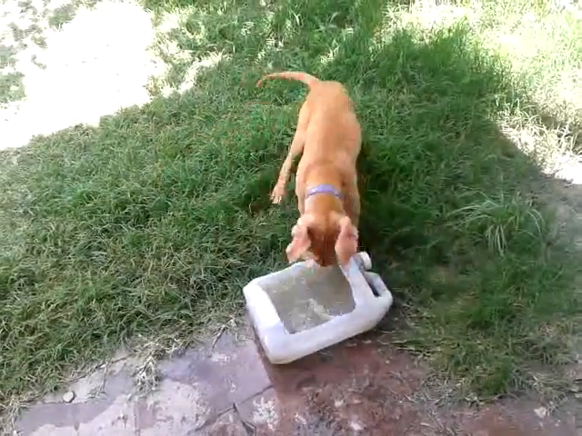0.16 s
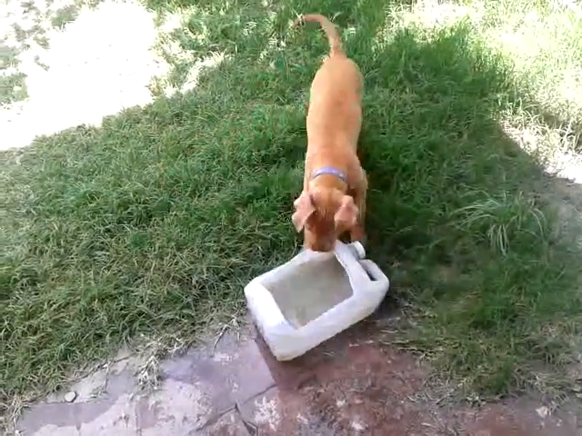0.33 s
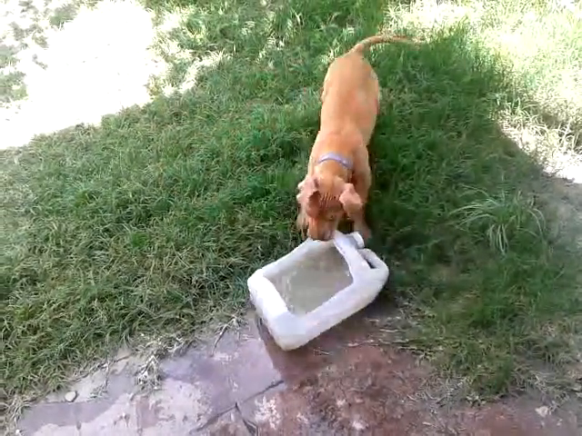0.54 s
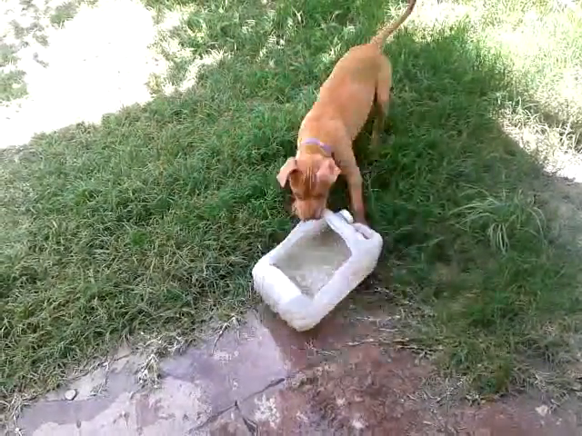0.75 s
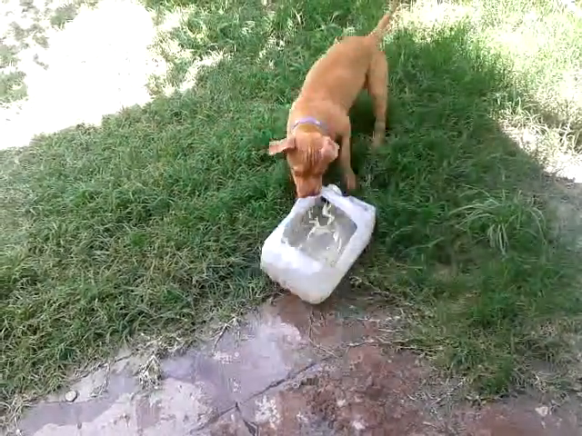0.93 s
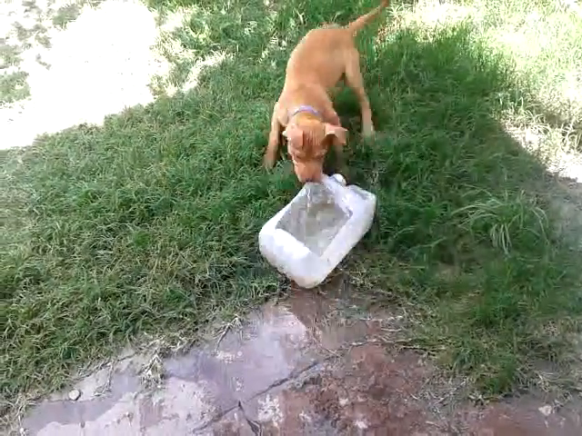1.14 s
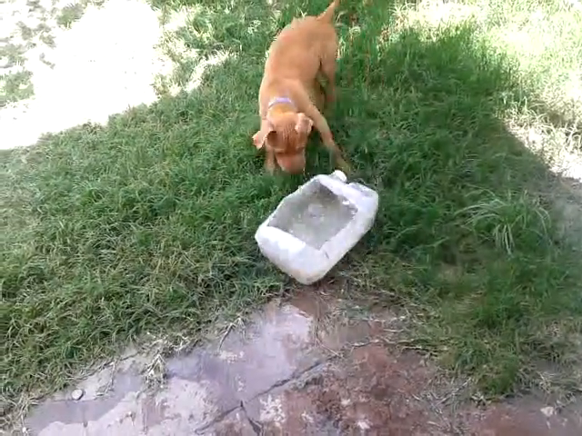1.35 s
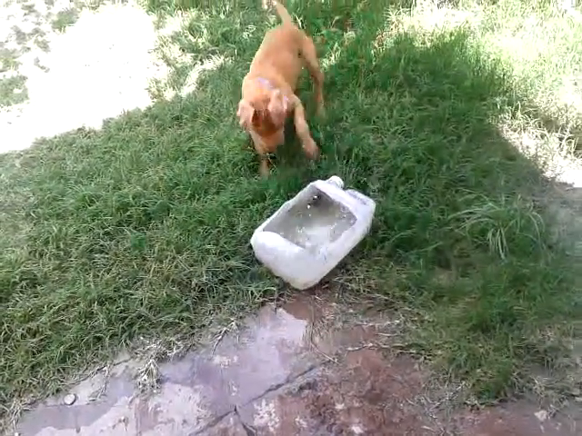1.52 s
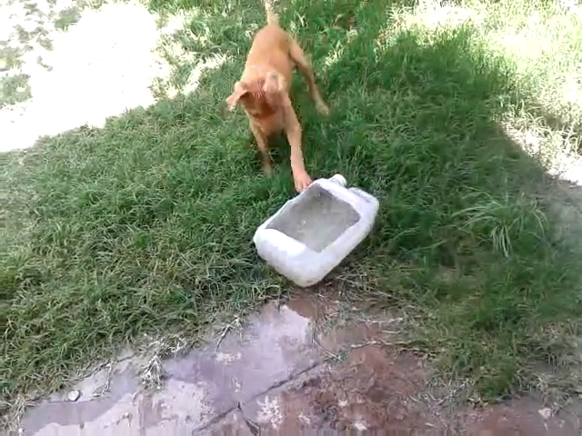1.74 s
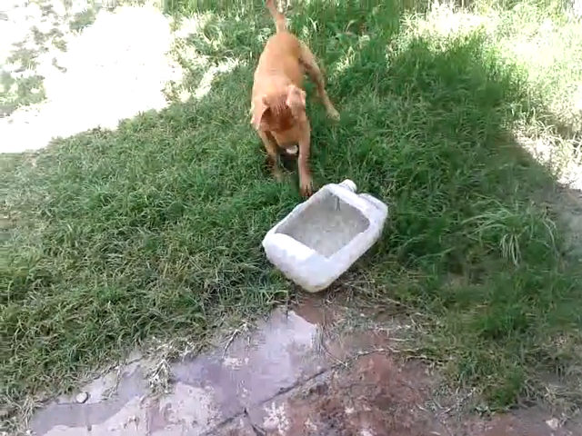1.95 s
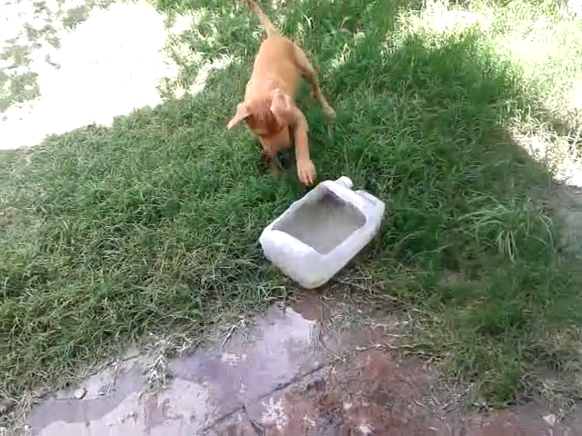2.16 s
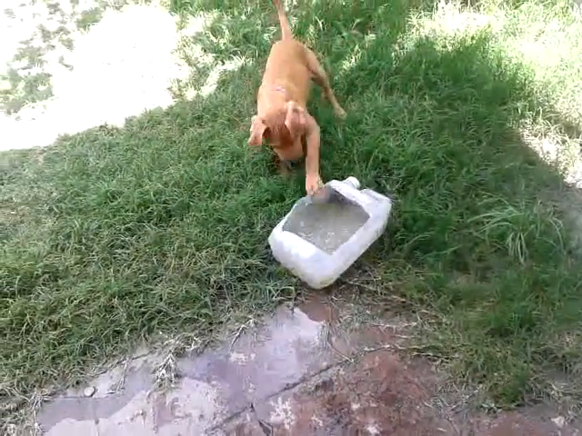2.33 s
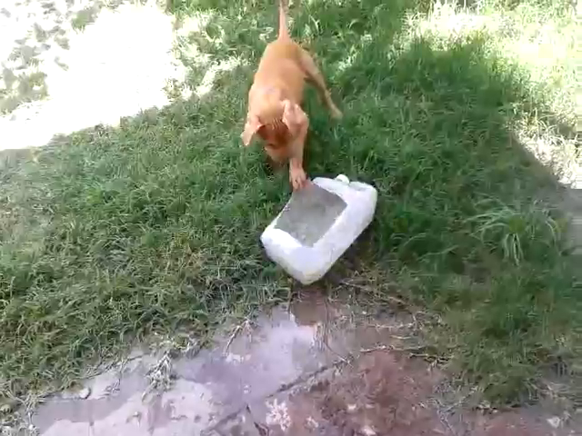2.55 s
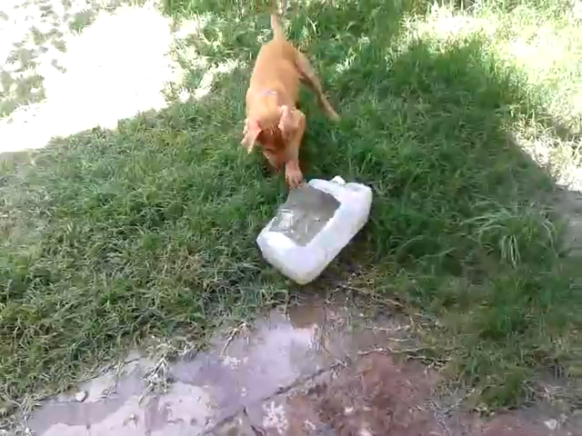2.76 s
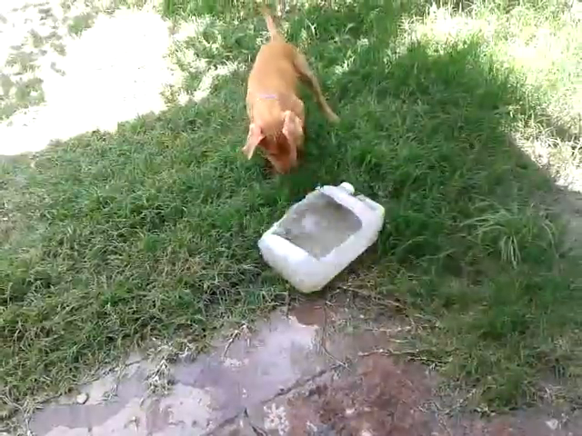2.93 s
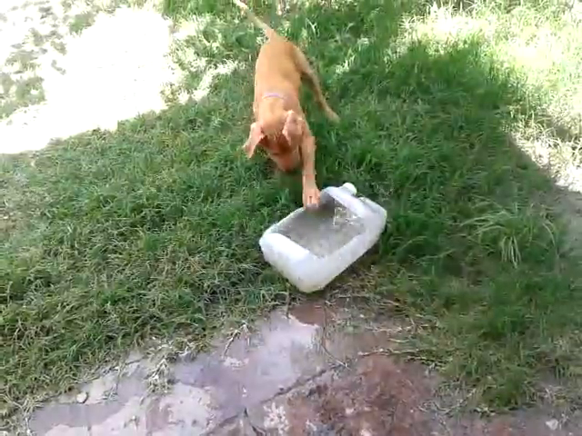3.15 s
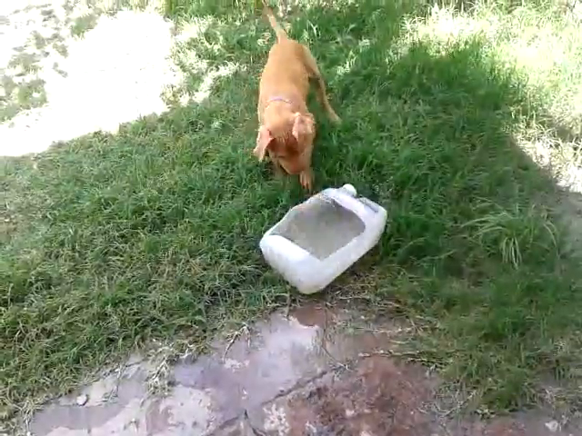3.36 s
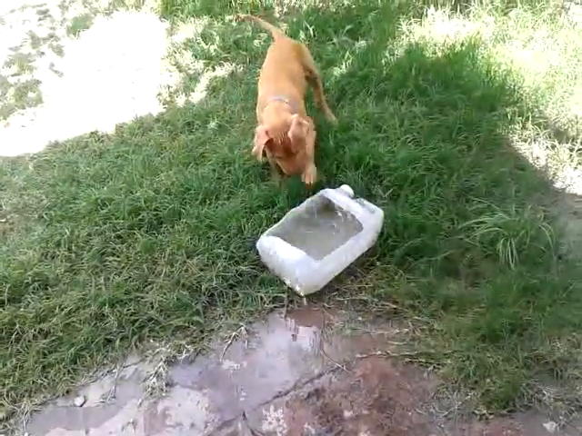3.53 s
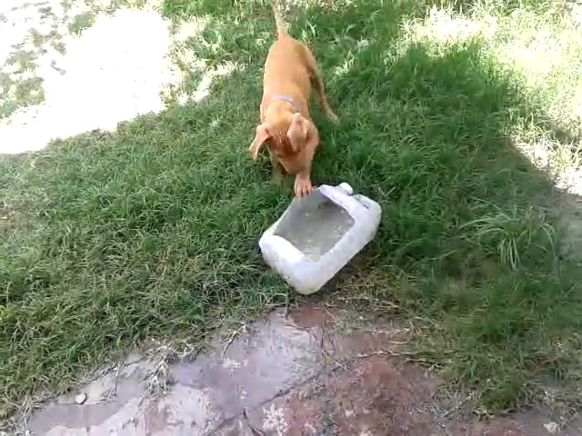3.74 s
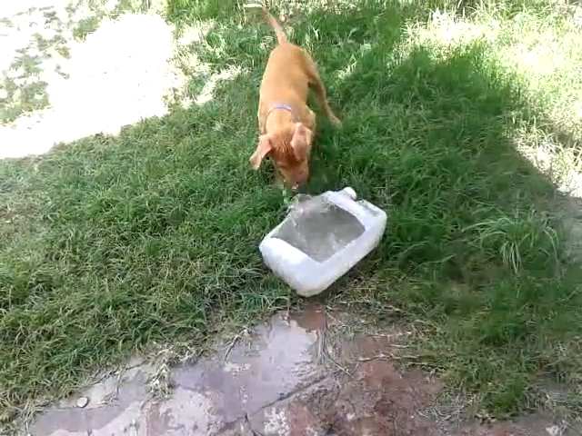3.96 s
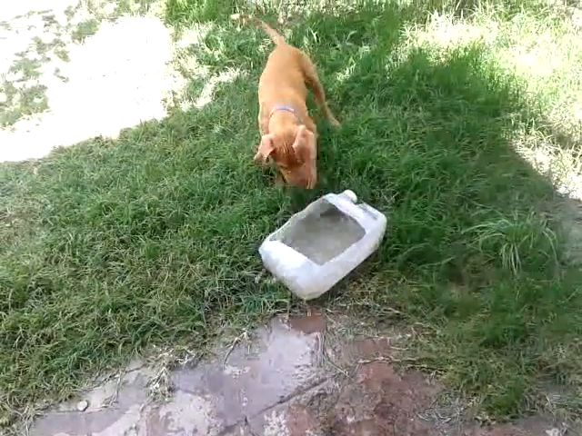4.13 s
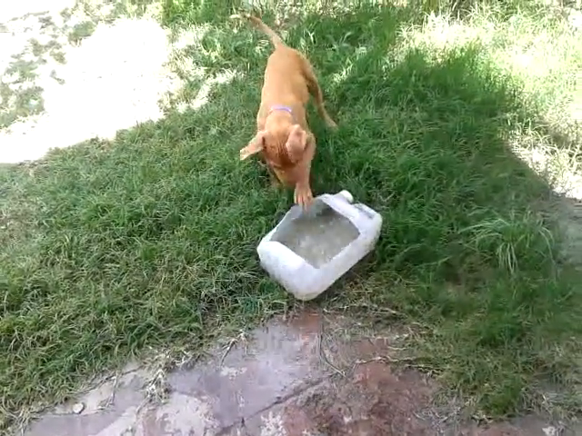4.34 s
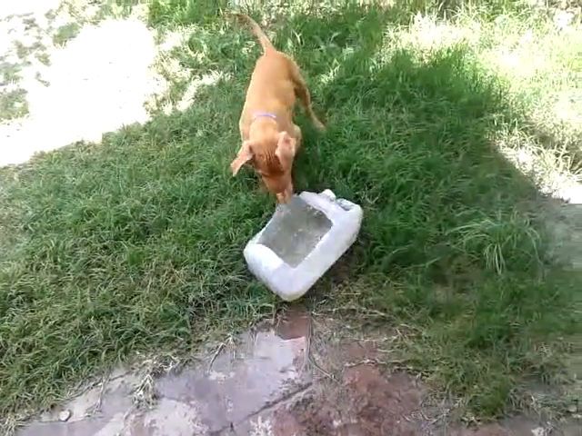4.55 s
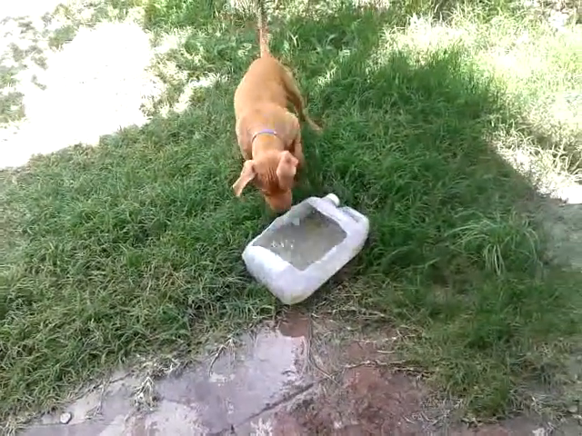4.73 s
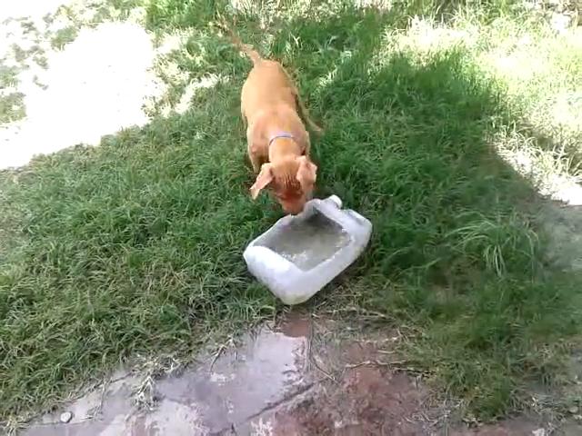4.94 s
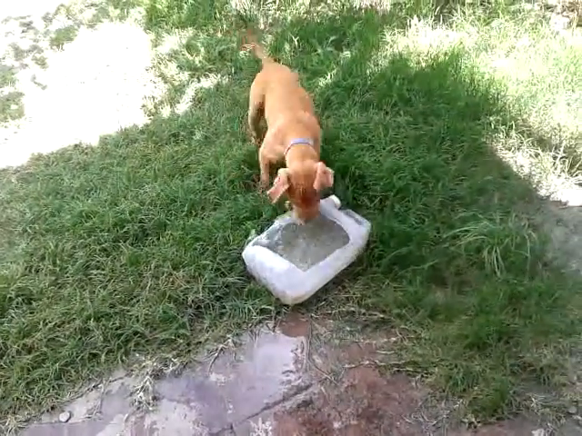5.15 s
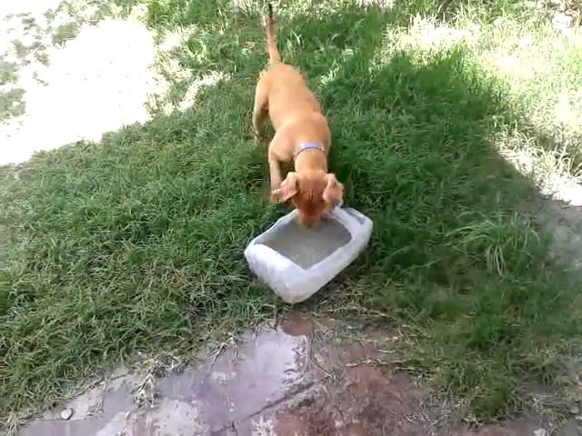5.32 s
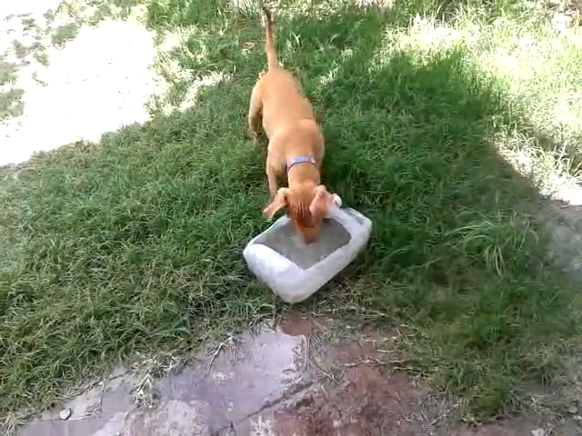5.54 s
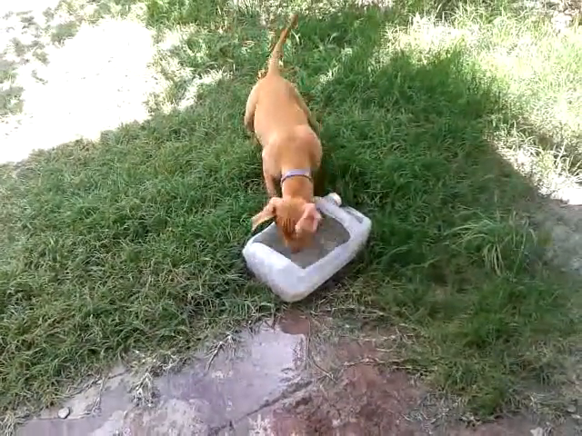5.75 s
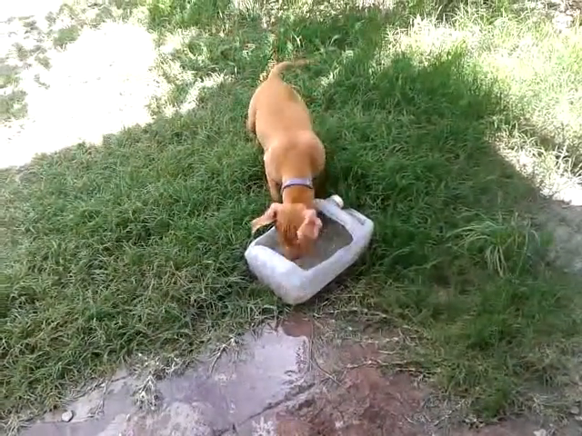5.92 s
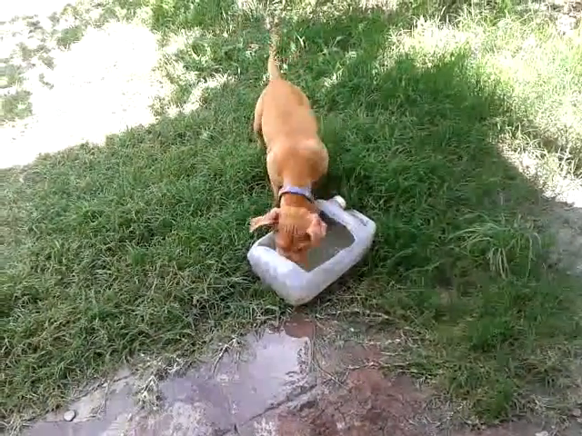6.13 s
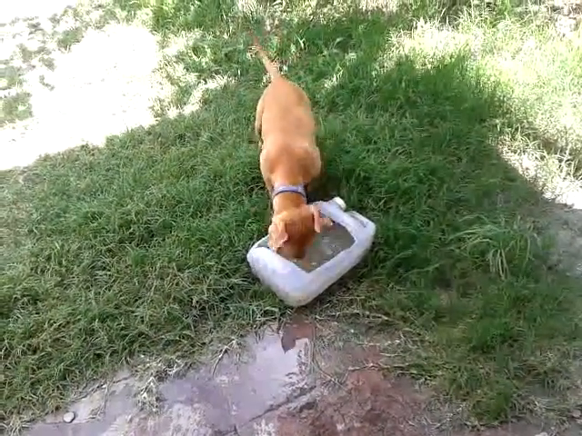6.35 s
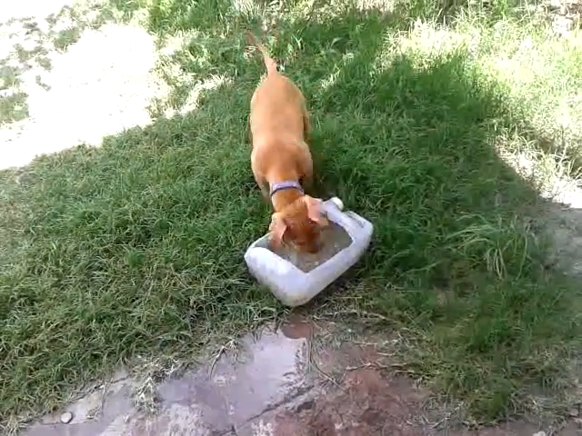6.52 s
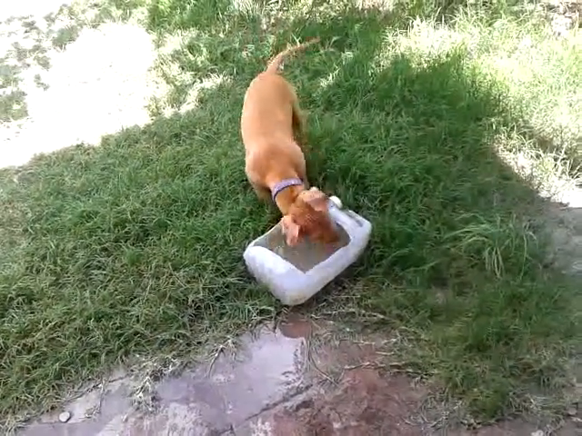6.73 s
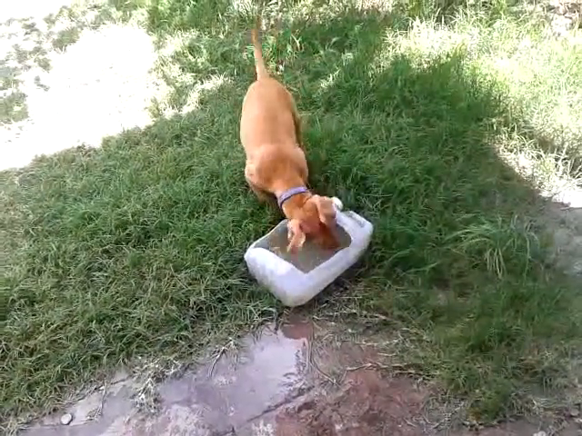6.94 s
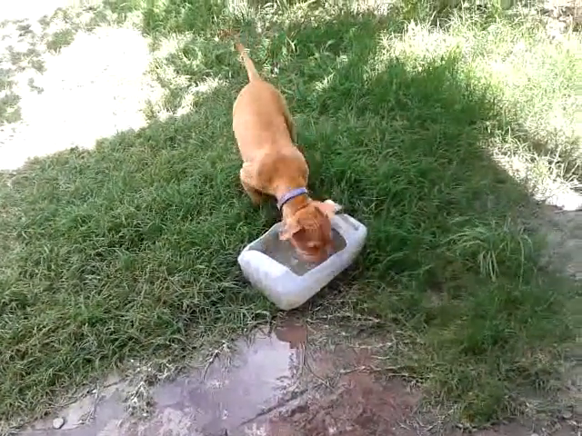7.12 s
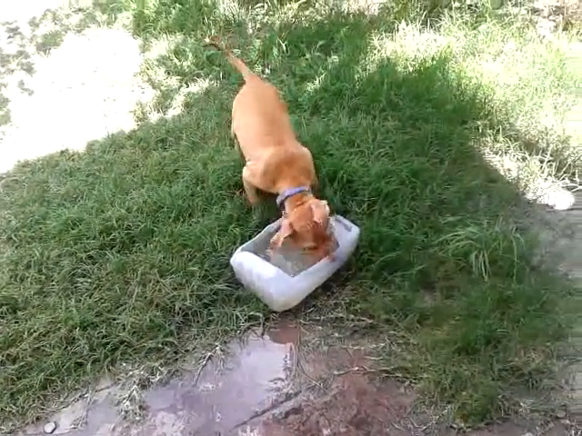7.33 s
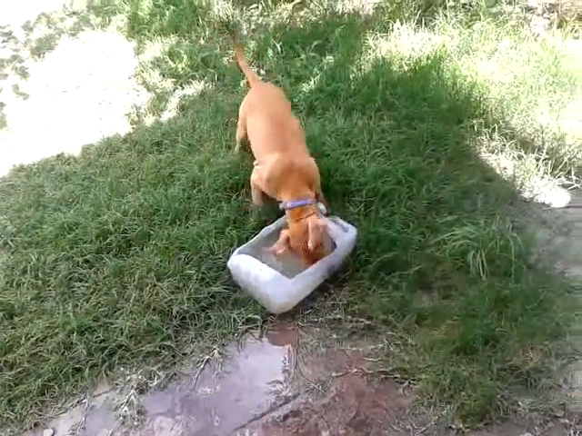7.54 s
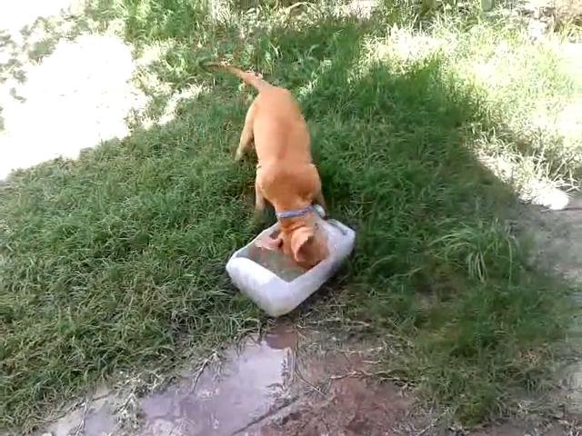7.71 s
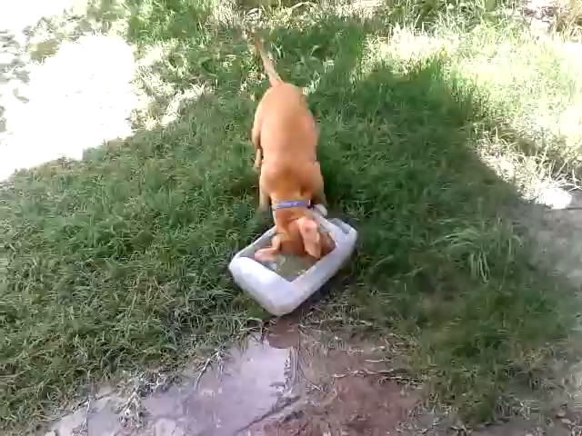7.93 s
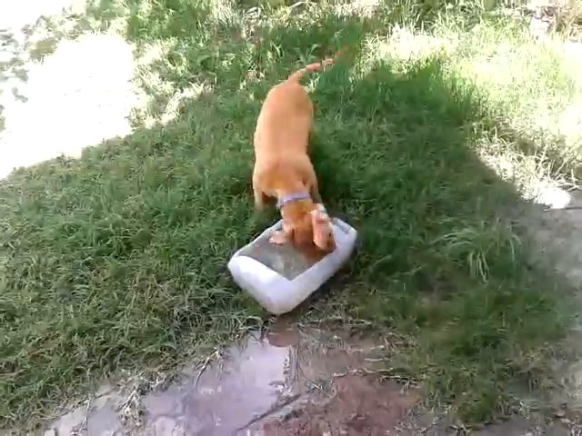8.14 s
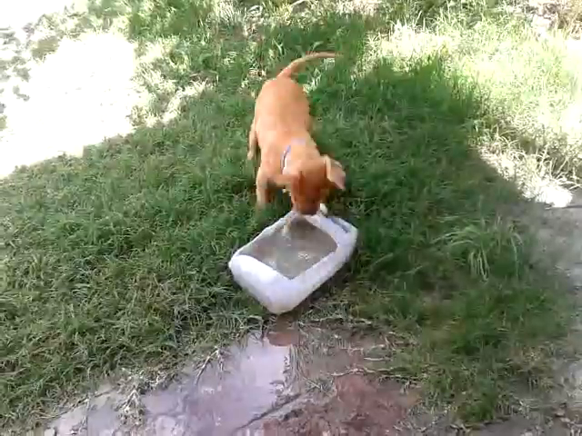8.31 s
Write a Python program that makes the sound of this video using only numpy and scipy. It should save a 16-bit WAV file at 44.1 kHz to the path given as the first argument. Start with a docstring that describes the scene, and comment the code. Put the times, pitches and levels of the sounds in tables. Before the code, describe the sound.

Outdoors, irregular hollow plastic knocks, grassy scraping and watery plops give way to gentle rhythmic dog lapping, with faint distant motor buzz and hiss.

```python
"""On a lawn in a yard, a puppy paws and noses a cut-open plastic jug holding a little water, then laps from it.
Claws ring the jug's damped modes with ticks and rasp, and the sliding base rustles as dense random grains.
Water is single bubble tones with gliding pitch, plus swells of bubble froth, low slosh and spray.
Nearby walls return a short wash; a distant motor of smeared pulses buzzes over filtered-noise rumble and hiss."""
import sys
import numpy as np
from scipy import signal
from scipy.fft import rfft, irfft
from scipy.io import wavfile
from scipy.ndimage import uniform_filter1d

SR = 44100
rng = np.random.default_rng(int(sys.argv[2]) if len(sys.argv) > 2 else 0)


def wav_record(signal):
    """Record a signal, one row per channel, as 16-bit PCM in the file named by sys.argv[1]."""
    frames = np.transpose(np.atleast_2d(signal))
    bounded = np.clip(frames, -1, 1)
    # unit amplitude maps onto the largest positive 16-bit level
    quanta = np.round(bounded * 32767).astype(np.int16)
    wavfile.write(sys.argv[1], SR, quanta)


N = 373527
TIME = np.arange(N) / SR


def undb(db):
    """Decibels to gain."""
    return 10 ** (np.asarray(db) / 20)


def unit(x):
    """Scale to rms 1."""
    return x / np.sqrt(np.mean(x ** 2) + 1e-20)


def attack_unit(x):
    """Scale to rms 1 over the first 9 ms."""
    return x / np.sqrt(np.mean(x[:int(.009 * SR)] ** 2))


def curve(table, axis=1):
    """One column of a table, joined by straight lines in time."""
    rows = np.array(table)
    return np.interp(TIME, rows[:, 0], rows[:, axis])


def colour(x, points):
    """Filter by a (Hz, dB) outline that falls away steeply past its ends; rms 1."""
    hz, db = np.transpose(points)
    f = np.maximum(np.fft.rfftfreq(len(x), 1 / SR), 1)
    outline = undb(np.interp(np.log(f), np.log(hz), db))
    low_end = 1 / np.sqrt(1 + (hz[0] / f / np.sqrt(2)) ** 8)
    high_end = 1 / np.sqrt(1 + (f / hz[-1] / np.sqrt(2)) ** 8)
    return unit(irfft(rfft(x) * outline * low_end * high_end, len(x)))


def band(x, lo_hz, hi_hz):
    """Causal band-pass."""
    edges = np.clip([lo_hz, hi_hz], 10, .45 * SR)
    return signal.sosfilt(signal.butter(2, edges, "band", fs=SR, output="sos"), x)


def fade(t, t60):
    """Exponential decay, down 60 dB after t60 seconds."""
    return np.exp(-np.log(1000) * t / max(t60, .001))


def walk(rate):
    """Smooth chance with a spread near 1, drawn anew `rate` times a second."""
    k = int(SR / rate)
    steps = np.repeat(rng.standard_normal(N // k + 1), k)
    return unit(uniform_filter1d(steps, k)[:N])


def add(out, s, sound):
    """Mix a sound in at a time in seconds."""
    i = max(int(s * SR), 0)
    out[i:i + len(sound)] += sound[:max(N - i, 0)]


def grains(rate, spread_db):
    """Dense random ticks of uneven size, about `rate` a second."""
    size_db = spread_db * np.minimum(rng.exponential(size=N), 4)
    return (rng.random(N) < rate / SR) * rng.standard_normal(N) * undb(size_db)


def bubble(hz, t60, rise, onset_s=0.00022):
    """A damped tone gliding by `rise` octaves a second, as an air pocket does on nearing the surface."""
    t = np.arange(int(max(t60, .002) * SR)) / SR
    cycles = np.cumsum(hz * 2 ** (rise * t)) / SR
    return np.sin(2 * np.pi * cycles) * fade(t, t60) * (1 - np.exp(-t / onset_s))


# swell of the low outdoor rumble: start_s, level_db
RUMBLE_SWELL = [(0, -49.5), (1.05, -48), (1.45, -51), (1.62, -59), (2.4, -51), (2.9, -52.5), (3.15, -45.5),
                (4.1, -50), (4.75, -51), (5.55, -50), (5.85, -52.5), (6.2, -49.5), (6.85, -53.5),
                (7.45, -52), (7.95, -51.5), (8.47, -51.5)]
# tone of the rumble: pitch_hz, level_db
RUMBLE_COLOUR = [(18, -3), (28, -4.5), (42, -5), (62, 0), (85, -10.5), (130, -30)]
# tone of the steady air and hiss: pitch_hz, level_db
AIR_COLOUR = [(60, 2.5), (110, 0), (200, -1.5), (300, -2.5), (500, -8), (900, -14.5), (1500, -17),
              (2300, -18.5), (3300, -21), (6000, -24.5), (10000, -26), (15500, -28)]


def outdoors(air_db=-54.0, hum_db=-66.0):
    """A swelling rumble and a faint wavering hum under nearly steady air and hiss, all filtered noise."""
    rumble = colour(rng.standard_normal(N), RUMBLE_COLOUR) * undb(curve(RUMBLE_SWELL))
    hum = undb(hum_db) * unit(band(rng.standard_normal(N), 202, 246))
    air = colour(rng.standard_normal(N), AIR_COLOUR) * undb(air_db + 0.83 * walk(4.7))
    return rumble + hum + air


# tone of the distant motor's casing: pitch_hz, level_db
MOTOR_COLOUR = [(150, -27.5), (400, -47), (850, 2.5), (1400, -10), (1900, -1), (2100, 5.5), (2350, 2),
                (2700, -5), (3300, -16.5), (5000, -28)]
BUZZ_HZ = 89.9  # mean pulse rate, two pulses to a shaft turn


def motor(buzz_db=-63.0, shaft_db=-61.5):
    """A distant motor hums at its shaft rate and buzzes twice a turn; the path smears each pulse."""
    pulse_count = np.cumsum(BUZZ_HZ * (1 + .001 * walk(3))) / SR
    # flat spectrum with scattered phases: a smeared click
    pulse = np.fft.fftshift(irfft(np.exp(.6j * rng.standard_normal(257))))
    pulses = np.interp(pulse_count % 1, np.linspace(0, 1, len(pulse)), pulse)
    buzz = undb(buzz_db) * colour(pulses, MOTOR_COLOUR)
    hum = undb(shaft_db + 2 * walk(1.67)) * np.sin(np.pi * pulse_count)
    return buzz + hum


# air pockets closing in the water: start_s, level_db (before the gulps' lift), starting pitch_hz, t60_s
BUBBLES = [(0.155, -34, 400, 0.046), (.172, -45, 531, 0.089), (.205, -38.5, 820, 0.041),
           (.828, -42, 710, 0.11), (1.07, -30, 278, 0.041), (1.109, -35.5, 370, .05),
           (1.136, -39, 1660, .037), (1.152, -28, 210, 0.044), (1.511, -39.5, 1740, .044),
           (1.834, -34, 324, .07), (2.030, -49.5, 340, 0.1), (2.485, -37, 390, 0.054),
           (2.940, -28, 489, 0.13), (3.201, -41.5, 1780, .07), (3.260, -40, 715, 0.074),
           (3.285, -41, 3380, .03), (3.422, -26, 368, 0.071), (3.480, -39, 1440, 0.028),
           (3.619, -39, 3080, .016), (3.934, -34, 205, .06), (4.016, -25, 414, 0.051),
           (4.095, -33.5, 312, 0.033), (4.196, -40, 2420, 0.019), (4.704, -25, 314, .049),
           (4.828, -42, 1680, .044), (5.042, -41, 2160, .026), (5.203, -29, 253, 0.023),
           (5.246, -37, 204, 0.071), (5.351, -33, 2300, 0.02), (5.824, -42, 388, 0.088),
           (5.930, -43.5, 784, 0.03), (6.078, -43, 319, 0.15), (6.098, -42, 374, 0.16),
           (6.166, -45, 3320, .016), (6.611, -47, 340, .12), (6.724, -41.5, 405, 0.073),
           (7.099, -47, 1820, 0.04), (7.210, -39, 1290, 0.032), (7.366, -31.5, 1550, 0.026),
           (7.463, -31, 268, 0.039), (7.481, -39.5, 430, 0.08), (7.551, -30, 1760, 0.018),
           (7.770, -36, 388, 0.054), (7.807, -38.5, 1640, 0.029), (7.820, -37.5, 2370, .022),
           (7.861, -39, 1690, 0.026), (7.896, -39.5, 1500, .019), (7.962, -38.5, 903, 0.071)]


def gulps(lift_db=2.5, rise_oct=0.22, glide_scatter=0.65):
    """The larger single bubbles and drips; most climb a little in pitch as they ring."""
    out = np.zeros(N)
    for (s, db, hz, t60), chance in zip(BUBBLES, rng.standard_normal(len(BUBBLES))):
        rise = rise_oct * (1 + glide_scatter * chance) / t60
        add(out, s, undb(db + lift_db) * bubble(hz, t60, rise))
    return out


def yard(x, low_db=-6.5, low_t60=0.24, high_db=-10.5, high_t60=0.097, build_s=0.0051):
    """Nearby walls return a short wash in which the lows last longest."""
    t = np.arange(SR // 2) / SR
    noise = rng.standard_normal((2, len(t))) * (1 - np.exp(-t / build_s))
    low, high = noise[0] * fade(t, low_t60), noise[1] * fade(t, high_t60)
    low_echo = undb(low_db) * band(low / np.linalg.norm(low), 303, 900)
    high_echo = undb(high_db) * band(high / np.linalg.norm(high), 1010, 6900)
    return signal.fftconvolve(x, low_echo + high_echo)[:N]


# the jug sliding over grass: start_s, level_db
SLIDE = [(.27, -65), (.39, -49), (.48, -51), (.57, -56.5), (.68, -54), (.82, -44), (.90, -51),
         (1.13, -47.5), (1.35, -56.5), (1.52, -50), (1.60, -54), (1.79, -55.5), (1.865, -49.5), (1.96, -68)]
# tone of the rustling grass: pitch_hz, level_db
SLIDE_COLOUR = [(130, -4), (380, 5), (560, -3), (730, 2.5), (1150, -7), (1700, 1.5), (2500, -4.5),
                (3200, -9), (4100, -22.5), (7200, -18.5), (9000, -28.5), (14000, -42)]
JOLT_DB, JOLT_T60_S = -9.5, 0.07  # extra scrape when a knock jolts the sliding jug, relative to the knock


def slide(catch_db=-9.0, judder_db=3.0):
    """The base judders over grass, jolted by each knock: a dense rustle, stiffer stalks catching as ticks."""
    moving = (TIME > SLIDE[0][0]) & (TIME < SLIDE[-1][0])
    rustle = unit(grains(7000, spread_db=2.0)) * undb(judder_db * walk(70))
    catches = undb(catch_db) * unit(grains(220, spread_db=1.0))
    drag = undb(curve(SLIDE))
    for s, db, *_ in KNOCKS:
        add(drag, s, undb(db + JOLT_DB) * fade(TIME[:SR // 4], JOLT_T60_S))
    return colour(rustle + catches, SLIDE_COLOUR) * drag * moving


# the jug's modes: pitch_hz, level_db (balance within its mode group), t60_s
JUG_MODES = [(278, -8, 0.033), (370, 5.5, 0.043), (482, -2.5, 0.05), (611.6, -9.5, 0.14), (715, 6.5, 0.031),
             (830, 7, 0.029), (954, -15.5, 0.098), (1170, -25, 0.0063), (1390, 4, 0.022), (1550, 7, 0.019),
             (1780, -16.5, 0.043), (2090, -9.5, 0.016), (2304, 5, 0.021), (2495, 13, 0.0095),
             (2600, -11, 0.018), (2990, -4, 0.028), (3018, 38, 0.017), (3360, -16, 0.053),
             (3470, -24, 0.025)]


def jug(wall_hz, part_db, scatter_db=4.5, detune=0.02):
    """One ring of the jug; where the blow lands shifts the main wall modes and weights four mode groups."""
    t = np.arange(SR // 4) / SR
    mode_hz, mode_db, mode_t60 = np.transpose(JUG_MODES)
    chance = rng.standard_normal((3, len(JUG_MODES), 1))
    # the shift is whole from 1250 to 1700 Hz and tapers to none outside 900 to 2200 Hz
    shift = np.interp(mode_hz, [900, 1250, 1700, 2200], [1, wall_hz / 1500, wall_hz / 1500, 1])
    hz = (mode_hz * shift)[:, None] * (1 + detune * chance[0])
    gains = undb(mode_db[:, None] + scatter_db * chance[1])
    decays = [fade(t, t60) for t60 in mode_t60]
    modes = gains * np.sin(2 * np.pi * hz * t + 0.89 * chance[2]) * decays
    # heavy low modes take longer to get going than the thin wall
    modes *= 1 - np.exp(-t * hz / 1.42)
    part = np.digitize(mode_hz, [920, 2200, 2850])  # low body, main wall, upper wall, rim
    return sum(undb(db) * attack_unit(modes[part == k].sum(axis=0)) for k, db in enumerate(part_db))


def thud(hz=150.4, t60=0.059):
    """The water-weighted base bumps the soft ground: a short low tone, pitched a little by chance."""
    return attack_unit(bubble(hz * np.exp(0.055 * rng.standard_normal()), t60, 0, onset_s=0.0044))


# claws and teeth on the jug: start_s, level_db (rms of the attack), then relative to the main wall
# low_body_db, upper_wall_db, tick_db; and wall_hz (main wall resonance, 1500 leaves the modes unshifted)
KNOCKS = [(0.4675, -28.5, -9, -2, -6, 1670), (0.4706, -30.5, -4, -17, -26, 1810),
          (1.0641, -26.5, -12, -9.5, -21, 1450), (1.1487, -35, -7, -14, -21, 1550),
          (1.195, -36, -3, -26, -28, 1510), (1.2879, -29, -15, 0.5, -20, 1740),
          (1.3711, -40, -4, -11, -10, 1600), (1.4537, -36.5, -11, -6, -12, 1760),
          (1.5657, -45.5, -11, 8, 3, 1790), (1.8808, -39.5, -7, -5, -15.5, 1690),
          (2.1948, -44.5, -0.5, -15, -19, 1450), (2.3037, -44.5, 13, -9, -16, 1540),
          (2.661, -42.5, 1, -6, -16, 1560), (2.8505, -20.5, -12.5, -3.5, -21, 1550),
          (2.9197, -25, -13, -6, -15.5, 1455), (2.9243, -16, -10, -7, -34, 1390),
          (3.421, -33.5, 6.5, -28, -17, 1480), (3.768, -42.5, 4.5, 0, -13, 1580),
          (3.9204, -33, -1, -16, -19, 1430), (3.9321, -25.5, -5, -22, -47, 1405),
          (3.994, -29, 4.5, -2, -20, 1710), (3.9982, -26, 4.5, -2, -19, 1510),
          (4.0135, -27.5, 6, -1, -18, 1500), (4.033, -34.5, 12, -18, -34, 1510),
          (4.4864, -31.5, -6.5, -18, -28, 1564), (4.532, -29, -0.5, -7, -20, 1516),
          (4.675, -25.5, 1.5, -9, -20.5, 1570), (4.685, -35, 5, 2, -35, 1500),
          (4.703, -24, 1.5, -5.5, -27, 1570), (4.722, -38, 9, -17, -38, 1360),
          (4.9242, -41, -5, 0, -19, 1550), (5.1319, -40, 9, -1, -16, 1390),
          (6.7255, -46, -12, 13, -8, 1780), (6.862, -48, -3, -17, -24, 1560),
          (7.456, -44.5, -3, -1, -24, 1790), (7.5371, -40, -1.5, -25, -22, 1690),
          (7.7708, -43, 2, 15, -14, 1450)]
RIM_DB, RIM_SHARE = -8, 0.75  # rim ring under the main wall, and the share of upper_wall_db it follows


def knocks(tick_t60=0.034, rasp_db=-6.5, rasp_t60=0.045, skid_db=-17.5, skid_t60=0.03, thud_db=-19.5):
    """Claws and teeth skid briefly, then strike: jug ring, contact tick and a rasp of small wall modes."""
    out, t = np.zeros(N), np.arange(SR // 4) / SR
    for s, db, low_db, upper_db, tick_db, wall_hz in KNOCKS:
        noise = rng.standard_normal((3, len(t)))
        tick = attack_unit(colour(noise[0], SPRAY_COLOUR) * fade(t, tick_t60))
        rasp = attack_unit(colour(noise[1], SPLASH_COLOUR) * fade(t, rasp_t60))
        ring = jug(wall_hz, [low_db, 0, upper_db, RIM_DB + RIM_SHARE * upper_db])
        blow = ring + undb(tick_db) * tick + undb(rasp_db + upper_db / 2) * rasp
        add(out, s, undb(db) * attack_unit(blow))
        # blows with a heavy low body push the whole jug down; the level is held for the hardest
        add(out, s, undb(min(db, -28) + low_db / 2 + thud_db) * thud())
        # hard blows bite at once, so the skid grows no further with their force
        skid = undb(min(db, -27) + skid_db) * attack_unit(colour(noise[2], SPLASH_COLOUR) * fade(t, skid_t60))
        add(out, s - t[-1], skid[::-1])  # reversed: swells up to the strike
    return out


# a knock's slosh: level from the knock and half its low body, delay after it, half length of the swell
SURGE_DB, SURGE_LAG_S, SURGE_HALF_S = -26, 0.048, 0.045
SURGE_LIMIT_DB = -45.0  # the shallow water can rock no harder than this, before the layer trims in water()
GENTLE_SPRAY_DB = -17.5  # spray under the splash of a lap or a surge


def surges(splash_db=-7.5):
    """The water rocks just after each knock, more for blows that move the jug's body."""
    stirs = []
    for s, db, low_db, *_ in KNOCKS:
        slosh = min(db + low_db / 2 + SURGE_DB, SURGE_LIMIT_DB)
        splash = slosh + splash_db
        stirs.append((s + SURGE_LAG_S, SURGE_HALF_S, splash, slosh, splash + GENTLE_SPRAY_DB))
    return stirs


def froth(lo_hz, hi_hz, cycles, spread_db, count):
    """A swarm of small bubbles of all sizes, the larger ringing lower and longer; rms 1."""
    out = np.zeros(N)
    for when, size, force, life in rng.random((count, 4)):
        hz = lo_hz * (hi_hz / lo_hz) ** size
        t60 = cycles * (.5 + life) / hz
        add(out, when * N / SR, undb(spread_db * force) * bubble(hz, t60, 0.54 / t60, onset_s=t60 / 50))
    return unit(out)


# paw and muzzle stir the water: crest_s, half_length_s, then before the layer trims
# splash_db, slosh_db (low), spray_db (fine)
SPLASHES = [(1.202, 0.01, -39.5, -52, -60), (1.407, 0.005, -39.5, -45, -69),
            (1.583, 0.0058, -41.5, -64, -55), (1.816, 0.0033, -42.5, -54, -58),
            (1.859, 0.008, -37, -59, -48.5), (2.312, .0076, -35, -44, -59), (2.35, 0.011, -50, -44.5, -72),
            (2.666, 0.014, -49.5, -60, -60), (2.996, 0.016, -47.5, -52, -58),
            (3.138, 0.017, -48, -53, -56.5), (3.195, .012, -45, -49, -64),
            (3.224, 0.013, -38.5, -38.5, -57), (3.292, 0.026, -43.5, -39.5, -59),
            (3.383, 0.017, -40.5, -47, -58), (3.623, .012, -49, -50, -57), (3.7, 0.019, -46.5, -46.5, -64),
            (3.867, 0.01, -46.5, -45.5, -68), (4.188, 0.021, -50.5, -51.5, -60),
            (4.267, 0.0099, -42, -43.5, -58), (4.32, 0.012, -46.5, -44.5, -66),
            (4.388, 0.012, -48.5, -57, -61), (4.931, 0.017, -42, -49, -62), (4.995, 0.017, -40.5, -46, -56),
            (5.123, 0.032, -46.5, -52.5, -64), (5.257, .028, -70, -51.5, -75),
            (6.2, 0.12, -55.5, -55.5, -75), (7.378, 0.045, -52, -50.5, -70), (7.701, 0.0093, -54, -45, -70),
            (8.15, 0.015, -52, -48, -68)]
# tone of the splash, also of the rasp and skid: pitch_hz, level_db
SPLASH_COLOUR = [(1000, 3), (1450, 6.5), (2000, 8), (2650, 4), (3400, 3), (3900, -16)]
# tone of the fine spray, also of the contact tick: pitch_hz, level_db
SPRAY_COLOUR = [(3800, 13), (5500, 13.5), (7500, 12), (10000, 3), (14000, -29)]


def water(splash_db=-4.0, slosh_db=-4.5, spray_db=-3.0, lean=0.18):
    """Each stir swells quickly and dies: small ringing bubbles, a lower slosh and fine spray."""
    small_bubbles = froth(1132, 4060, cycles=42, spread_db=26.5, count=9000)
    splash = undb(splash_db) * colour(small_bubbles, SPLASH_COLOUR)
    slosh = undb(slosh_db) * froth(320, 1014, cycles=12.7, spread_db=5.5, count=3000)
    spray = undb(spray_db) * colour(grains(1800, spread_db=2.0), SPRAY_COLOUR)
    power = np.zeros((3, N))
    for s, half_s, *layer_db in SPLASHES + laps() + surges():
        near = slice(*np.searchsorted(TIME, [s - .15, s + .15]))
        age = (TIME[near] - s) / half_s
        # the lean makes the rise shorter than the fall
        swell = np.exp(-.5 * (age / (1 + min(lean, .8) * np.sign(age))) ** 2)
        power[:, near] += np.outer(undb(layer_db), swell) ** 2
    return (np.sqrt(power) * [splash, slosh, spray]).sum(axis=0)


# vigour of the lapping, before the layer trims in water(): start_s, splash_db, slosh_db
LAPPING = [(5.9, -63, -52), (6.1, -71, -60), (6.29, -55, -45), (6.68, -50.5, -50), (7.07, -57, -48.5),
           (7.28, -49, -46), (7.48, -54.5, -45), (7.9, -47.5, -52), (8.3, -51.5, -53)]
# an even rhythm that slows a little: each gap outlasts the one before by twice LAP_SLOWING_S
LAP_START_S, LAP_PERIOD_S, LAP_SLOWING_S, LAP_HALF_S = 5.91, 0.188, 0.0011, 0.017
# water dropping from the tongue after each lap: delay, half length, level relative to the lap
FALLBACK_S, FALLBACK_HALF_S, FALLBACK_DB = 0.079, 0.021, -6.5


def laps(count=13):
    """Each lap of the tongue stirs the water twice: as it dips in, and as the water drops back."""
    when, splash, slosh = np.transpose(LAPPING)
    stirs = []
    for k in range(count):
        s = LAP_START_S + k * (LAP_PERIOD_S + k * LAP_SLOWING_S)
        splash_db = np.interp(s, when, splash)
        db = np.array([splash_db, np.interp(s, when, slosh), splash_db + GENTLE_SPRAY_DB])
        stirs.append((s, LAP_HALF_S, *db))
        stirs.append((s + FALLBACK_S, FALLBACK_HALF_S, *(db + FALLBACK_DB)))
    return stirs


def scene():
    """Jug and water with their echo in the yard, over the background."""
    play = knocks() + slide() + gulps() + water()
    return (play + yard(play) + motor() + outdoors())[None]


def record(dry):
    """A steep low-pass cuts the top above 15.6 kHz."""
    return signal.sosfilt(signal.ellip(10, .1, 60, 15600, fs=SR, output="sos"), dry)


dry = scene()
out = record(dry)
wav_record(out)
```